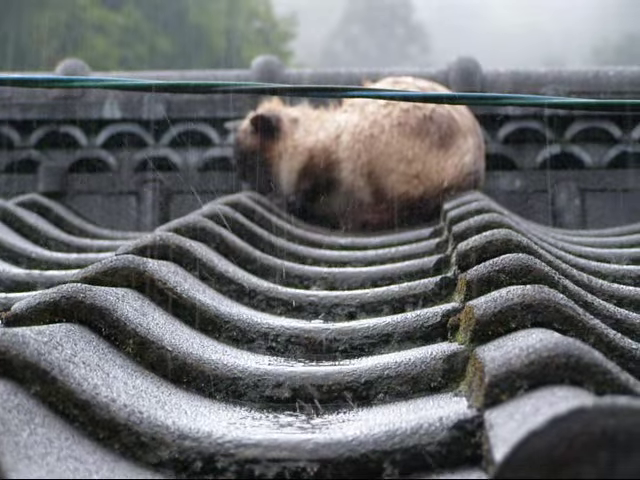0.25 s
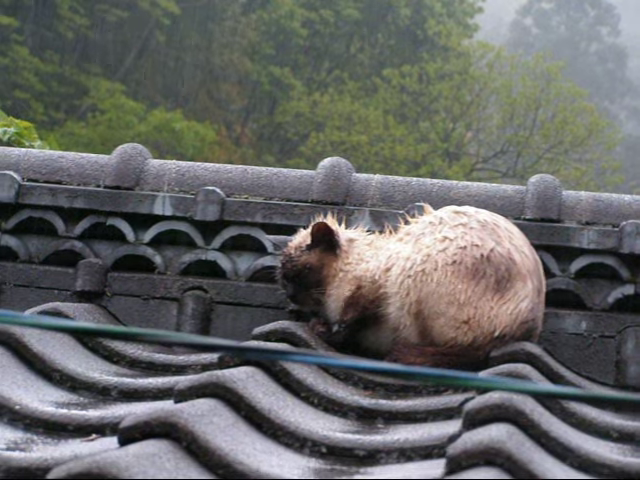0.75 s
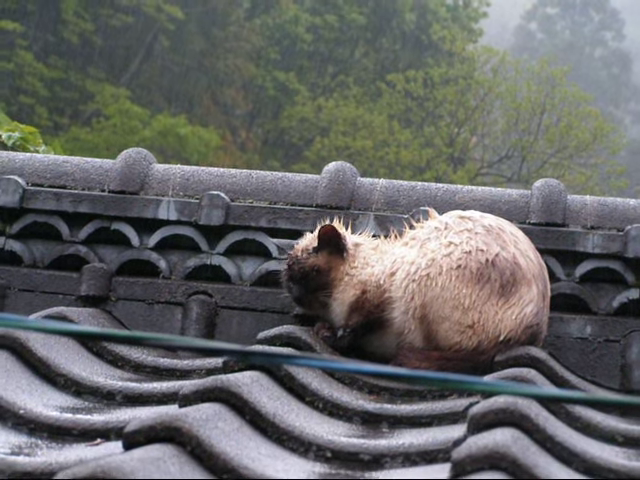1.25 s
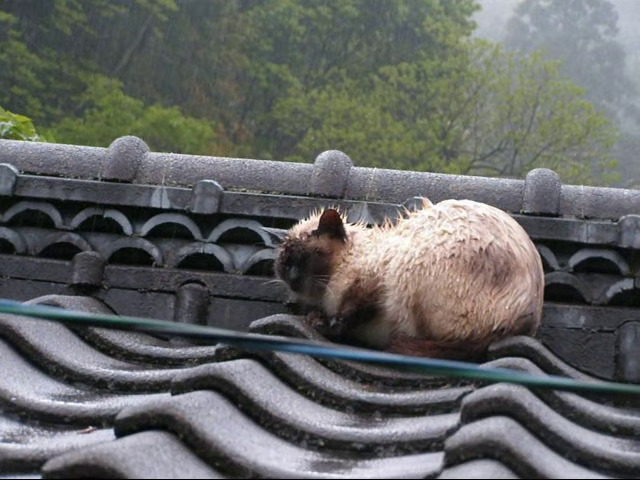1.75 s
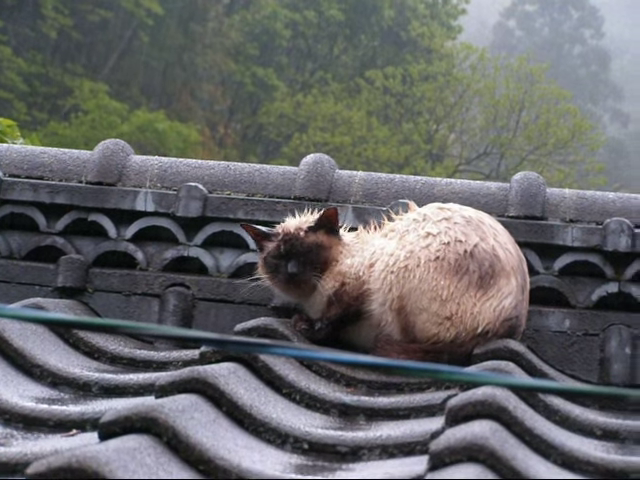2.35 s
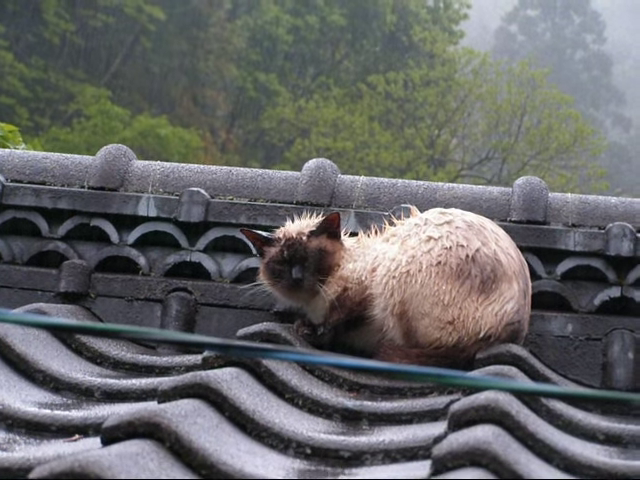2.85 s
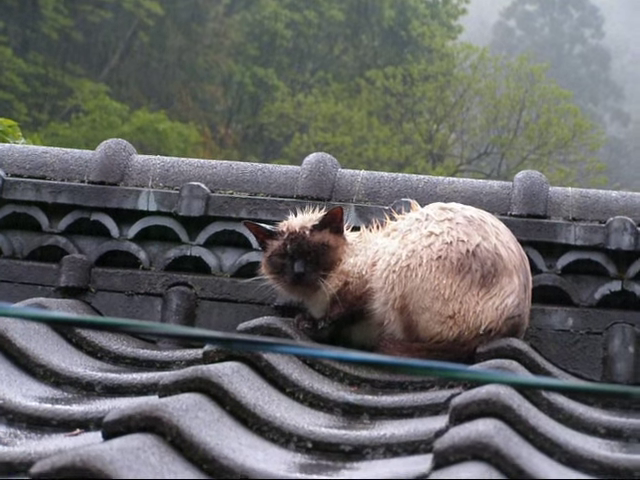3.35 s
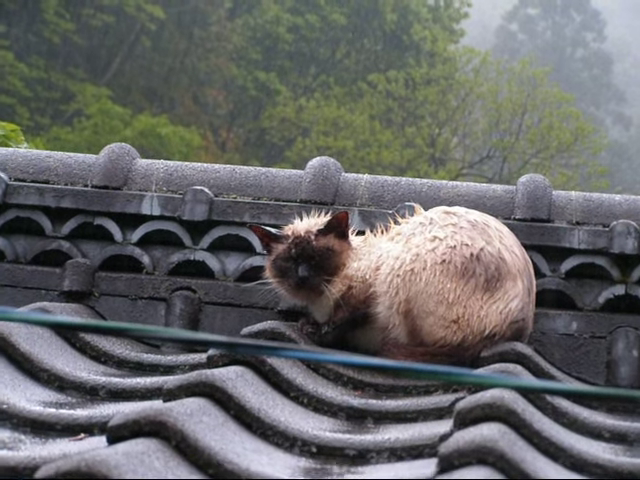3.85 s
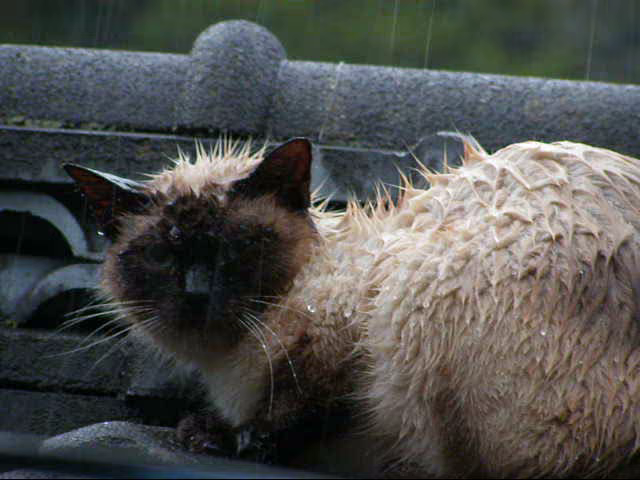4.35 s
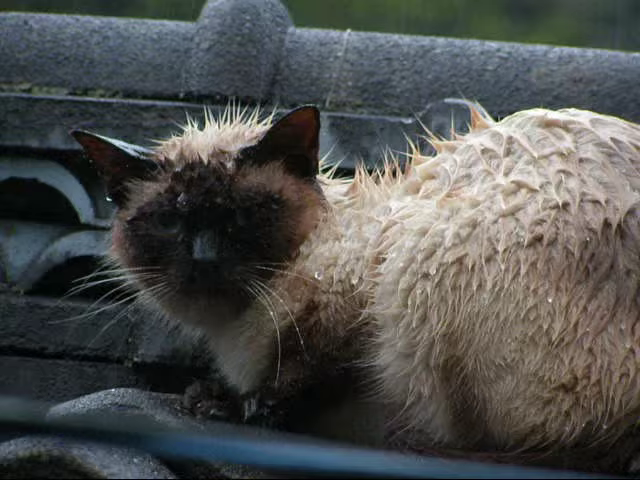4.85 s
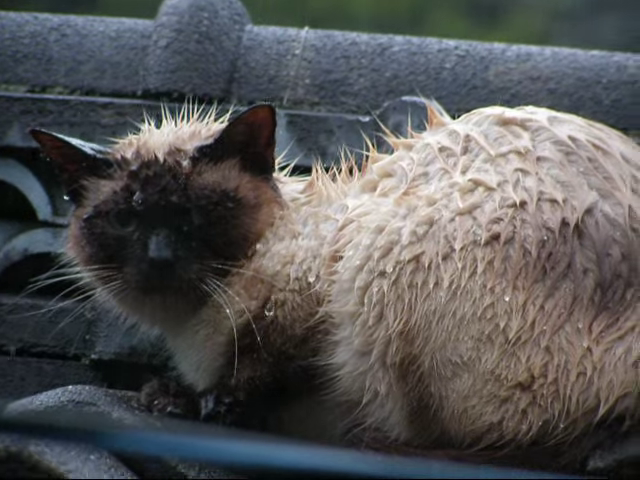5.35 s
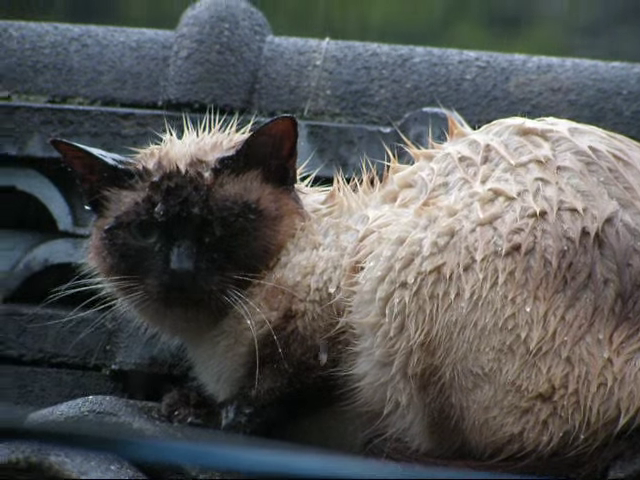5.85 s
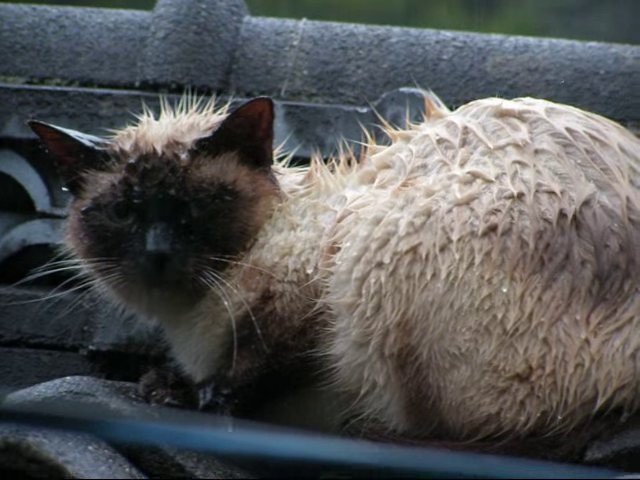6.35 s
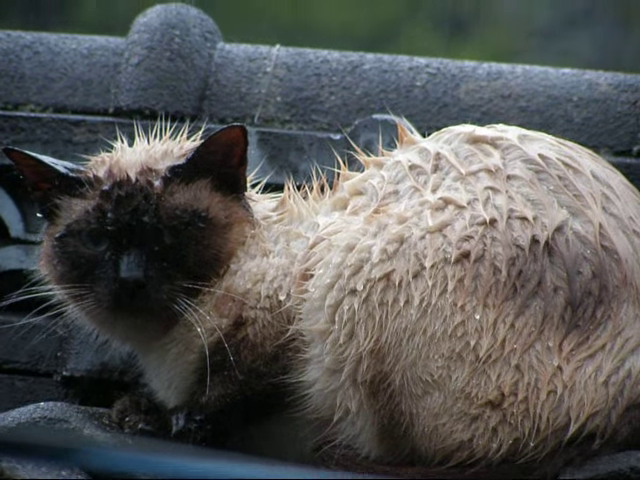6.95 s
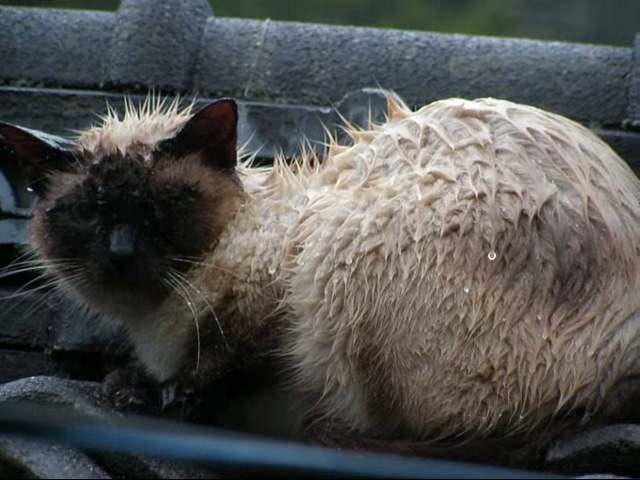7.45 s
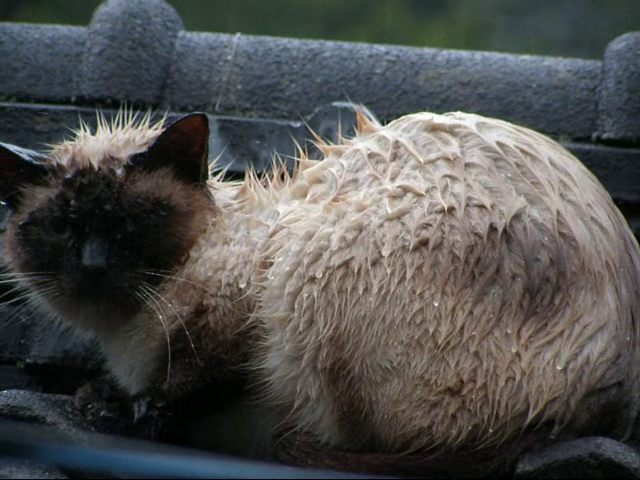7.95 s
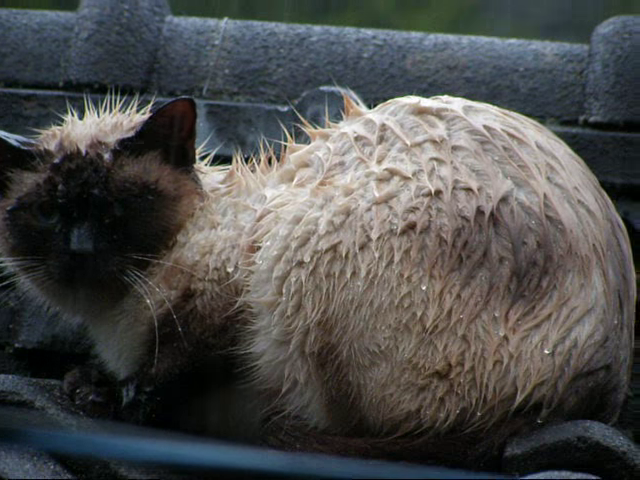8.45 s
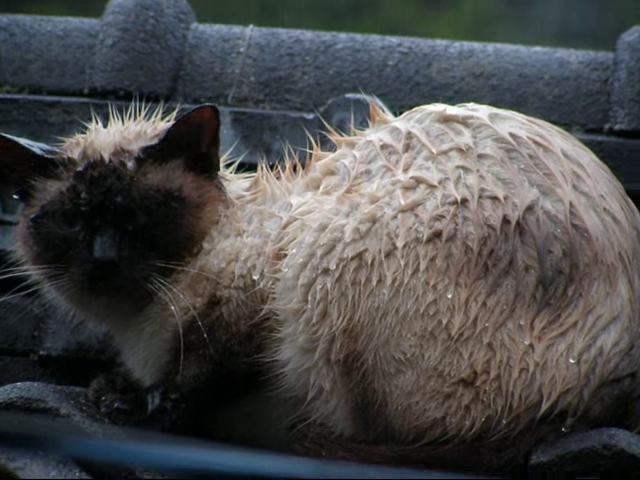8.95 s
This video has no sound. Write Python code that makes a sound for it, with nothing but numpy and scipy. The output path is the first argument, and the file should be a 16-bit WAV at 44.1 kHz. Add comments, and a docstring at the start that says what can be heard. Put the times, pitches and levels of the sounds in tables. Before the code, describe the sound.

Heavy rain drums on a tiled roof in a dense, dull hiss, with crowded sharp drop taps and two thin bright ticks.

```python
"""Heavy rain on a tiled roof, heard from close by under the eave, held to a narrow band. From the start far
rain is a wash of coloured noise, nearer drops patter in clumps or ring on resonators, and a faint low rumble
lies beneath; the biggest drops soon land over it as sharp three-part taps, and the treble flickers faintly at
the top of the band. Just before half a second the rain bed steps down as a thin, bright tick cuts across; a
second tick follows near 4.5 s, and the bed is thinnest shortly after 5 s."""
import sys
import numpy as np
from scipy import signal
from scipy.fft import rfft, irfft
from scipy.io import wavfile

SR = 44100
rng = np.random.default_rng(int(sys.argv[2]) if len(sys.argv) > 2 else 0)


def log_audio(samples):
    """Write samples as a 16-bit WAV file to the path given in sys.argv[1]."""
    # one column per channel
    frames = np.atleast_2d(samples).T
    # limit to full scale, then quantise
    limited = np.clip(frames, -1, 1)
    pcm = np.round(limited * 32767).astype(np.int16)
    wavfile.write(sys.argv[1], SR, pcm)


N = 405719

# The course of the rain bed, before the balance of its layers.
# Each row: time in seconds, level in dB.
RAIN_LEVEL = [(0, -22), (0.464, -22.5), (0.475, -25), (1.4, -26), (3.05, -26), (3.599, -27), (4.3, -26.5),
              (5.2, -29.5), (6.4, -28), (8.2, -26.5), (8.84, -27), (9.2, -26)]
# The biggest drops, levels before strike share and filters.
# Each row: start in seconds, thud level in dB, knock level in dB, snap level in dB.
BIG_DROPS = [(0.0201, -24.5, -31, -39), (0.047, -2.5, -9, -15), (0.1602, -7, -2, -21),
             (0.2398, -29, -4, -25), (0.4202, -8, -4, -31), (0.4428, -28, -9, -24.5),
             (0.5346, -17, -6.5, -17), (0.5669, -23.5, -10, -19), (0.6008, -36, -1.5, -13.5),
             (0.6278, -17, -20, -29), (0.717, -7, -20, -23), (0.8553, -15, -14.0, -20),
             (0.9278, -13, -18, -26), (0.9429, -13, -3, -15), (0.9766, -14, -14, -17),
             (1.0942, -24, -3.5, -19), (1.1387, -12.5, -9.5, -19), (1.2133, -18.5, -4.5, -16),
             (1.27, -24.5, -9, -18), (1.3335, -26, -7.5, -15), (1.3477, -27, -6.5, -24),
             (1.502, -37, -16, -19), (1.5302, -33, -7, -19), (1.5807, -27, -7, -23),
             (1.6158, -31.5, -7, -20), (1.6563, -24, -20, -40), (1.7098, -29, -27, -27),
             (1.7625, -20, -14, -12), (1.7895, -8, -25, -15), (1.821, -22, -3, -21), (1.8734, -9, -33, -37),
             (1.9009, -13, -20, -24), (2.0036, -15, -12, -14), (2.1569, -17, -16, -18),
             (2.1971, -17, -6.5, -18), (2.336, -19, -10.5, -27), (2.3474, -33, -18, -27),
             (2.481, -37, -7.5, -13.5), (2.539, -30, -6, -15.5), (2.6022, -15.5, -7, -14.5),
             (2.6186, -12.5, -6.5, -21), (2.6616, -24, -6.5, -25), (2.7548, -23.5, -9, -16),
             (2.853, -25, -8.5, -23), (2.9033, -12.5, -1.5, -29), (2.9735, -24, -10, -24),
             (3.01, -33, -11, -22), (3.0251, -10, -5.5, -22), (3.0695, -9, -4.5, -15),
             (3.1382, -5, -2.5, -27), (3.1977, -19, -5.5, -23), (3.2375, -37, -18, -28),
             (3.2551, -18, -16, -24), (3.2897, -26, -8, -21), (3.3473, -21, -13, -26),
             (3.3644, -25, -14, -30), (3.4055, -33, -25, -30), (3.5682, -45, -7, -19),
             (3.617, -16, -8.5, -25), (3.6544, -29, -9.5, -18), (3.7757, -12.5, -6.5, -15),
             (3.9023, -8, -10, -13), (4.0229, -27, -15, -17), (4.0544, -10.5, -8.5, -31),
             (4.1691, -24, -7, -18.5), (4.2524, -7.5, -1.5, -35), (4.3604, -13, -3.5, -14),
             (4.3808, -11.5, -14, -29), (4.3961, -31, -9.5, -19), (4.4382, -22, -5.5, -12),
             (4.5006, -28, -10.5, -22), (4.5237, -25, -9, -32), (4.5429, -29, -6.5, -13),
             (4.5825, -37, -26, -14.5), (4.6527, -35, -24, -30), (4.6834, -10, -9, -25),
             (4.7048, -16.5, -7.5, -21), (4.7164, -29, -18, -21), (4.7341, -25, -11, -28),
             (4.7464, -6.5, -10, -16), (4.7927, -18, -10, -15.5), (4.808, -27, -13, -35),
             (4.8291, -12.5, -9.5, -31), (4.9329, -10, -2.5, -14), (4.9959, -27, -8.5, -15),
             (5.0099, -22, -21, -19), (5.042, -34, -15, -22), (5.0644, -4.5, -4.5, -12),
             (5.0951, -18, -14, -13.5), (5.1692, -40, -7, -30), (5.1828, -5.5, -3.5, -13.5),
             (5.2637, -10.5, -2, -10), (5.3204, -25, -4.5, -19), (5.3395, -33, -14, -21),
             (5.4075, -13, -3, -30.0), (5.4273, -10.5, -12.5, -34), (5.4402, -17, -8.5, -13),
             (5.4877, -17, -12.5, -14.5), (5.5299, -28, -11.5, -37), (5.5492, -9.5, -11.5, -24),
             (5.5726, -20.5, -6, -14.5), (5.6269, -12, -8, -14), (5.6531, -27.5, -9, -32.5),
             (5.7662, -12, -8, -23), (5.7932, -31, -9, -29), (5.8633, -36.5, -5, -29),
             (5.8898, -13, -7, -22), (5.9048, -25, -15, -30), (5.9363, -25, -15, -25),
             (5.9636, -48, -21, -44), (5.9753, -56, -9, -13), (6.0211, -11.5, -14, -17.5),
             (6.1031, -12, -10, -20), (6.1294, -12.5, -10.5, -31), (6.1605, -31, -10, -18),
             (6.1959, -18.5, -9.5, -25), (6.2271, -14, -7.5, -14.5), (6.3071, -23, -36, -18),
             (6.354, -16, -12, -17), (6.3869, -6, -9, -18.5), (6.4132, -8, -4, -18), (6.4555, -21, -5, -18),
             (6.4941, -23.5, -11, -32), (6.5369, -12, -9, -14.5), (6.5787, -17, -10, -15),
             (6.6197, -30, -14.5, -34), (6.7004, -16, -12, -17), (6.7256, -15, -20, -32),
             (6.7437, -20, -10, -15), (6.7834, -8, -5, -26), (6.8184, -8, -9, -15), (6.8586, -32, -16, -32),
             (6.8913, -30, -19, -23.5), (6.9309, -10, -8.5, -14.5), (6.9488, -12.5, -11, -12.5),
             (6.9897, -22.5, -13, -24.5), (7.0681, -20.0, -13, -19), (7.091, -15, -8, -36),
             (7.1073, -21, -8, -21), (7.1232, -14, -12, -30), (7.1819, -12, -6, -17),
             (7.2271, -12, -9, -14.5), (7.3487, -6, -2.5, -19), (7.4372, -18.5, -26, -14),
             (7.5246, -20, -19, -25), (7.5507, -19, -6.5, -15.5), (7.5702, -32, -12, -21),
             (7.6746, -26, -8, -29), (7.6962, -10, -3.5, -24), (7.7075, -21, -8, -26),
             (7.7371, -27, -16, -26), (7.7598, -29, -22, -21), (7.8035, -12.5, -13, -27),
             (7.8164, -9, -9.5, -21), (7.8407, -12, -24.5, -20), (7.8554, -31, -29, -29),
             (7.9025, -36, -19, -21), (7.9794, -8.5, -8, -21), (8.036, -16, -4.5, -17),
             (8.0963, -12.5, -7.5, -26), (8.1226, -12.5, -9.5, -19), (8.1431, -14, -11, -15.5),
             (8.2346, -28, -11, -37), (8.2629, -18.5, -16, -23), (8.2982, -12, -9, -36),
             (8.3393, -10, -12, -25), (8.3728, -10.5, -7.5, -27), (8.3861, -29, -7.5, -20),
             (8.4583, -31, -10, -23), (8.4889, -9.5, -23, -30), (8.5278, -14, -6, -27),
             (8.5522, -6, -7, -16), (8.633, -12, -11, -27), (8.6699, -11, -10, -25),
             (8.7276, -12, -8.5, -19), (8.8018, -35, -9, -22), (8.8224, -14, -5.5, -27),
             (8.8792, -8, -11, -21), (8.9045, -9, -9, -16), (8.9381, -18, -10.5, -20),
             (8.9738, -12, -6.5, -20.5), (8.9931, -16, -25, -14.5), (9.0099, -13, -5, -39),
             (9.0309, -16, -6, -13), (9.0577, -11, -14, -25), (9.0729, -6.5, -7, -34),
             (9.101, -15, -9.5, -17), (9.1341, -36.5, -9, -9), (9.1569, -21, -23, -32),
             (9.1834, -11, -6, -17.0)]
# Colour of tiles, eave and microphone together, scaled as a whole later.
# Each row: frequency in Hz, relative level in dB.
TAP_COLOUR = [(35, -58.5), (60, -57), (108, -27.5), (160, -17.5), (260, -10), (527, -2.5), (605, -3),
              (700, -6.5), (811, -12.5), (947, -9), (1290, -11.5), (1650, -6.5), (1820, -6), (2240, -14),
              (2710, -13), (3280, -17.5), (3650, -21), (3800, -28), (4810, -48.5), (8140, -120)]
# Faint treble flickers, which also cue the lumps of the rumble.
# Each row: cue in seconds, level in dB before the speck lift.
FLICKER_CUES = [(0.0603, -61), (0.1511, -68), (0.3616, -65), (0.4379, -65), (0.8654, -68), (0.9087, -62),
                (0.9882, -68), (1.063, -68), (1.0899, -72), (1.1802, -69), (1.2685, -63), (1.3229, -70),
                (1.4296, -69), (1.5, -67), (1.6841, -67), (1.7644, -63), (1.7878, -67), (1.8178, -71),
                (1.9001, -71), (2.156, -65), (2.1939, -66), (2.3271, -65), (2.4583, -67), (2.4818, -67),
                (2.5326, -67), (2.5616, -67), (2.6165, -65), (2.6549, -66), (2.7511, -60), (2.8389, -69),
                (2.8633, -76), (3.0126, -67), (3.0709, -65.5), (3.1378, -68.5), (3.2074, -69),
                (3.2345, -64), (3.3054, -72), (3.4012, -66), (3.7429, -67.5), (3.8097, -74), (3.8521, -75),
                (4.0153, -71), (4.057, -60), (4.135, -67), (4.1644, -68), (4.2148, -70), (4.2921, -70),
                (4.356, -69), (4.3934, -70), (4.4358, -70), (4.5431, -64), (4.583, -75), (4.6389, -69),
                (4.7296, -73), (4.802, -68), (4.93, -64), (5.007, -69), (5.0604, -60), (5.1193, -73),
                (5.181, -64), (5.255, -73), (5.3103, -71), (5.3726, -66), (5.436, -71), (5.5243, -70),
                (5.5882, -74), (5.6496, -69), (5.7643, -68), (5.7912, -68), (5.8601, -68), (5.8885, -72.5),
                (5.9509, -69), (5.9997, -71), (6.0975, -75), (6.1908, -73), (6.2522, -72), (6.3215, -69),
                (6.3959, -68), (6.4497, -75), (6.4976, -74), (6.5321, -65), (6.576, -63), (6.6204, -72),
                (6.7406, -65), (6.7775, -64), (6.8154, -76), (6.8548, -66), (6.9272, -68), (6.986, -67),
                (7.0628, -67), (7.1147, -72), (7.212, -73), (7.2444, -71.5), (7.2843, -66), (7.3507, -66),
                (7.4335, -68), (7.5537, -69), (7.5882, -76), (7.6765, -67), (7.7563, -64), (7.8072, -64),
                (7.8441, -70), (7.9004, -65), (7.9778, -69), (8.0361, -66), (8.092, -64), (8.1449, -66),
                (8.23, -76), (8.2975, -66), (8.3739, -74), (8.4332, -70), (8.4871, -74), (8.5535, -69),
                (8.6682, -69), (8.7056, -69), (8.737, -69), (8.8228, -68), (8.896, -63), (8.962, -69),
                (8.9885, -68), (9.0284, -71.5), (9.1007, -67.5)]
# Thin, bright ticks, before their high-pass.
# Each row: start in seconds, step height in dB.
TICK_STEPS = [(0.4694, -7), (4.4697, -11.5)]

THUD_TOP_HZ, SNAP_FOOT_HZ = 850, 2500   # borders between the three parts of a tap
LEAD_IN = 128   # samples kept ahead of each tap part
SURGE_DB = 0.54   # the whole rain bed swells and thins together
PING_LOW_HZ, PING_HIGH_HZ = 337, 3425
RUMBLE_HZ = 102
RUMBLE_DB, RUMBLE_LUMP_DB = -73.5, -57   # steady part; lump with each flicker
RUMBLE_LUMP_S = .011   # spread of a bell-shaped lump
STRIKE_SHARE = .68   # level factor of the bare strike in a tap
SPATTER_S, SPATTER_SHARE = .007, 0.43   # farthest before or after a big drop; largest share of its size
TAP_FOOT_HZ = 265   # big taps carry little bass
MIC_FOOT_HZ = 104   # the rain reaches the microphone without its lowest bass
OVERLOAD = .75   # ceiling towards which peaks are rounded
BAND_TOP_HZ, CUTOFF_HZ = 4021, 16100   # top of the narrow band; top of the whole sound
FLICKER_FOOT_HZ, FLICKER_FALL_HZ = 3565, 3730
SPECK_DB = 26   # lift that makes up for what the flicker filters take away
FLICKER_S = .007   # twice the spread of the specks in time
OFFSET = -.0028   # constant shift of the waveform


def from_db(db):
    """Turn decibels into a level factor."""
    return 10 ** (np.asarray(db) / 20)


def rms_one(x):
    """Bring a signal to an RMS of 1."""
    return x / np.sqrt(np.mean(x ** 2) + 1e-20)


def heard(x, response):
    """Pass a signal through an impulse response."""
    return signal.fftconvolve(x, response)[:N]


def filtered(x, order, hz, kind="low"):
    """Shape a signal with a Butterworth filter."""
    return signal.sosfilt(signal.butter(order, hz, kind, fs=SR, output="sos"), x)


def drift(rate_hz):
    """Slow chance: noise through a double one-pole low-pass, run in; spread 1."""
    step = 40   # samples between slow values
    pole = np.exp(-2 * np.pi * rate_hz * step / SR)
    noise = rng.standard_normal(N // step + 2002)
    slow = signal.lfilter([1], [1, -2 * pole, pole * pole], noise)[2000:]
    return np.interp(np.arange(N) / step, np.arange(len(slow)), rms_one(slow))


def tap_parts(size=4096):
    """Causal (minimum-phase) answer to one impact, split into thud, knock and snap."""
    hz, level_db = np.transpose(TAP_COLOUR)
    log_hz = np.log(np.maximum(np.arange(size // 2 + 1), 1) * SR / size)
    log_level = np.interp(log_hz, np.log(hz), level_db) * np.log(10) / 20
    # folding the cepstrum puts the energy as early as the colour allows
    cepstrum = irfft(log_level, size)
    cepstrum[1:size // 2] *= 2
    cepstrum[size // 2 + 1:] = 0
    spectrum = np.exp(rfft(cepstrum))
    thud = 1 / (1 + np.exp(8 * (log_hz - np.log(THUD_TOP_HZ))))
    snap = 1 / (1 + np.exp(-12 * (log_hz - np.log(SNAP_FOOT_HZ))))
    shares = thud, 1 - thud - snap, snap
    # rolled so that the short lead-in of each part is kept
    return [np.roll(irfft(spectrum * share, size), LEAD_IN)[:size // 2] for share in shares]


def splash(strikes, share, spread_s):
    """After each impact the water scatters: a short dying burst of noise follows the strike."""
    t = np.arange(int(.08 * SR)) / SR
    decay = np.exp(-t / spread_s) / np.sqrt(spread_s * SR)
    burst = heard(np.abs(strikes), decay)
    return share * burst * rng.standard_normal(N)


def random_strikes(per_s, size_db):
    """Drops land by chance, with mixed sizes and either polarity."""
    born = rng.random(N) < per_s / SR
    size = from_db(size_db * np.minimum(rng.exponential(1, N), 2.5))
    return born * size * rng.choice([-1, 1], N)


def wash(parts, flicker_db):
    """Countless far drops: noise in the colour of a tap, its parts wavering together and apart."""
    gust = drift(2.8)
    out = 0
    for part in parts:
        waver_db = flicker_db * (0.71 * gust + 1.1 * drift(3.2))
        out = out + heard(rng.standard_normal(N), part) * from_db(waver_db)
    return rms_one(out)


def patter(parts, per_s, size_db, clump_db, colour_db):
    """Nearer drops at random, in clumps; where a drop lands on the tile sets its mix of parts."""
    strikes = random_strikes(per_s * from_db(clump_db * drift(25)), size_db)
    out = 0
    for part in parts:
        mix_db = colour_db * np.clip(rng.standard_normal(N), -2, 2)
        hits = strikes * from_db(mix_db)
        out = out + heard(hits + splash(hits, share=0.74, spread_s=0.0014), part)
    return rms_one(out)


def rings(strikes, low_t60_s, count):
    """Deal the strikes to resonators spread in pitch; higher ones die sooner."""
    dealt, out = rng.integers(0, count, N), 0
    for k, hz in enumerate(np.geomspace(PING_LOW_HZ, PING_HIGH_HZ, count)):
        t60_s = low_t60_s * np.sqrt(PING_LOW_HZ / hz)   # time to die by 60 dB
        radius = np.exp(-np.log(1000) / (t60_s * SR))
        angle = 2 * np.pi * hz / SR
        feed = [1 - radius ** 2, 0, radius ** 2 - 1]
        back = [1, -2 * radius * np.cos(angle), radius ** 2]
        # the tiny constant keeps the numbers from getting too small
        out = out + signal.lfilter(feed, back, strikes * (dealt == k) + 1e-18)
    return out


def pings(parts, per_s, size_db, low_t60_s, count):
    """Some drops hit a loose tile edge or a puddle and ring a few cycles at one pitch."""
    strikes = random_strikes(per_s, size_db)
    return rms_one(heard(rings(strikes, low_t60_s, count), sum(parts)))


def rumble(rows):
    """Low-passed noise: a faint rumble that swells in a lump with each flicker and thins out between."""
    marks = np.zeros(N)
    marks[(np.array(rows)[:, 0] * SR).astype(int)] = 1
    bell = np.exp(-.5 * (np.arange(-2000, 2001) / (RUMBLE_LUMP_S * SR)) ** 2)
    lumps = np.sqrt(np.maximum(signal.fftconvolve(marks, bell, "same"), 0))
    low = rms_one(filtered(rng.standard_normal(N), 3, RUMBLE_HZ))
    lump_level = from_db(RUMBLE_LUMP_DB + 2.5 * drift(4.8))
    return (from_db(RUMBLE_DB) + lump_level * lumps) * low


def taps(rows, parts):
    """Each drop strikes the three parts, slaps again as it flattens, comes with spatter, splashes and trickles off."""
    rows, out = np.array(rows), 0
    at = np.round(rows[:, 0] * SR).astype(int) - LEAD_IN
    chance = rng.random((len(at), 6))
    again = at + ((.0004 + 0.0013 * chance[:, 0]) * SR).astype(int)
    # two smaller drops land close before or after each big one
    beside = at[:, None] + (SPATTER_S * SR * (2 * chance[:, 2:4] - 1)).astype(int)
    for k, part in enumerate(parts):
        strikes, size = np.zeros(N), from_db(rows[:, k + 1])
        strikes[beside] = SPATTER_SHARE * (2 * chance[:, 4:] - 1) * size[:, None]
        strikes[again] = 0.32 * (2 * chance[:, 1] - 1) * size
        strikes[at] = size
        scatter = splash(strikes, share=0.31, spread_s=0.0029)
        trickle = splash(strikes, share=0.26, spread_s=0.069)
        peak = np.abs(signal.hilbert(part)).max()
        out = out + heard(STRIKE_SHARE * strikes + scatter + trickle, part / peak)
    return filtered(out, 1, TAP_FOOT_HZ, "high")


def flicker(rows, count):
    """A ragged cluster of faint specks, strongest just at the edge of the band, duller upwards."""
    rows, specks = np.array(rows), np.zeros(N)
    chance = rng.standard_normal((len(rows), 2 * count))
    at = (rows[:, :1] + .003 + FLICKER_S * chance[:, :count] / 2) * SR
    specks[np.clip(at.astype(int), 0, N - 1)] = from_db(rows[:, 1:] + SPECK_DB) * chance[:, count:]
    specks = specks + splash(specks, share=0.32, spread_s=0.0023)
    edge = filtered(specks, 2, [FLICKER_FOOT_HZ, 4150], "band")
    above = filtered(specks, 3, FLICKER_FALL_HZ)
    above = filtered(above, 6, FLICKER_FOOT_HZ, "high")
    return above + from_db(13.5) * edge


def ticks(rows):
    """Sudden steps of which only the treble stands out."""
    out = np.zeros(N)
    for start_s, level_db in rows:
        out[round(start_s * SR):] += from_db(level_db)
    return filtered(out, 1, 4500, "high")


def scene():
    """Balance wash, patter and pings into a rain bed, then lay big drops and rumble with it."""
    parts = tap_parts()
    far = from_db(-8.5) * wash(parts, flicker_db=2.0)
    near = patter(parts, per_s=900, size_db=3.0, clump_db=2.5, colour_db=3.5)
    near = near + from_db(-5.5) * pings(parts, per_s=250, size_db=1.5, low_t60_s=.03, count=18)
    bed_db = np.interp(np.arange(N) / SR, *np.transpose(RAIN_LEVEL)) + SURGE_DB * drift(3.9)
    bed = from_db(bed_db) * (far + from_db(-0.23) * near)
    rain = filtered(bed + taps(BIG_DROPS, parts), 3, MIC_FOOT_HZ, "high")
    return (rain + rumble(FLICKER_CUES))[None]


def record(dry):
    """Peaks are rounded, a narrow band is kept without delay at its edge; flicker, ticks and a small offset follow."""
    rounded = OVERLOAD * np.tanh(dry / OVERLOAD)
    # run forwards and backwards, so the steep filters add no delay
    narrow = signal.sosfiltfilt(signal.cheby2(18, 45, BAND_TOP_HZ, fs=SR, output="sos"), rounded)
    full = narrow + flicker(FLICKER_CUES, count=7) + ticks(TICK_STEPS) + OFFSET
    return signal.sosfiltfilt(signal.cheby2(16, 40, CUTOFF_HZ, fs=SR, output="sos"), full)


dry = scene()
out = record(dry)
log_audio(out)
```